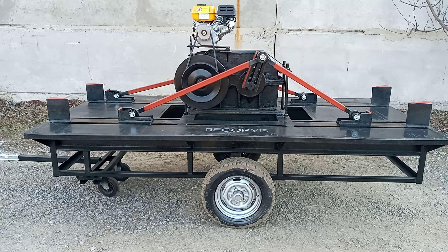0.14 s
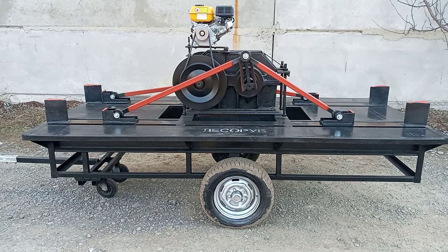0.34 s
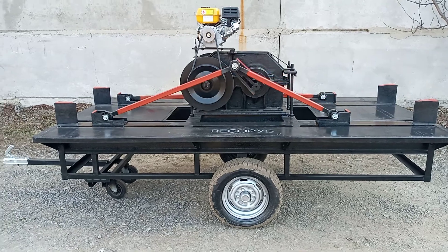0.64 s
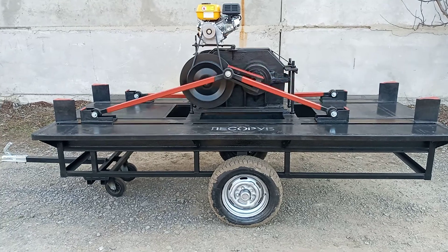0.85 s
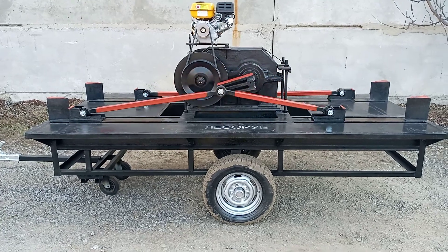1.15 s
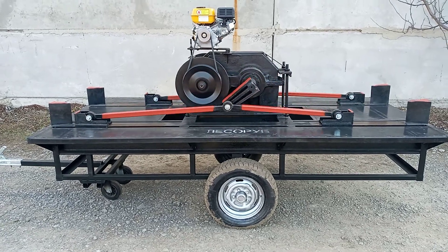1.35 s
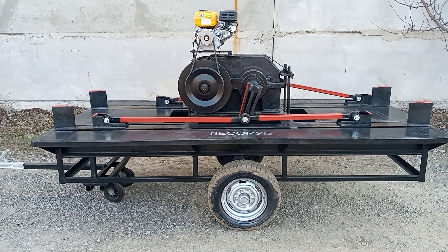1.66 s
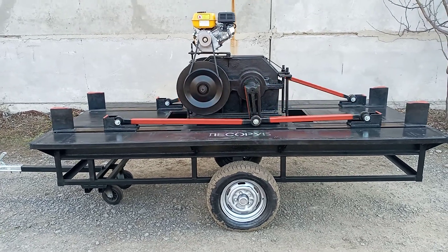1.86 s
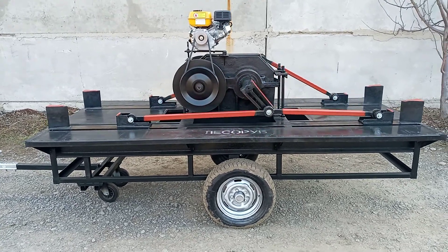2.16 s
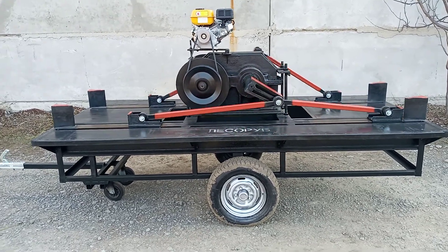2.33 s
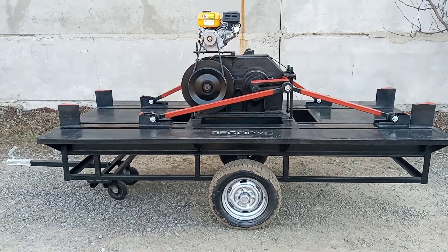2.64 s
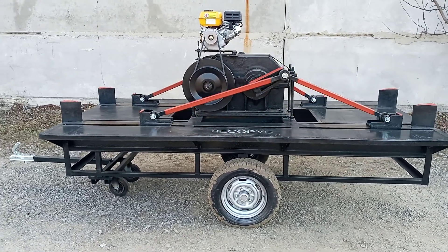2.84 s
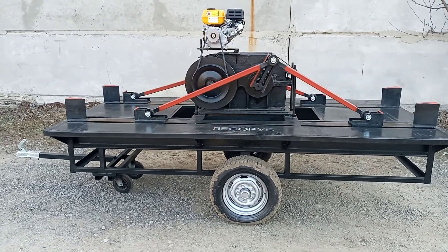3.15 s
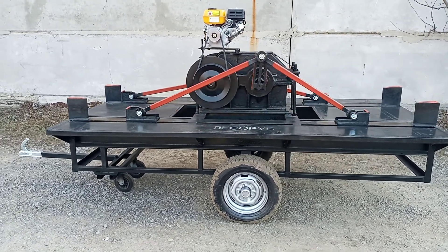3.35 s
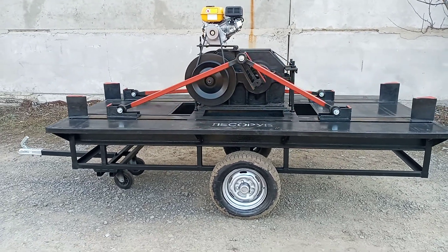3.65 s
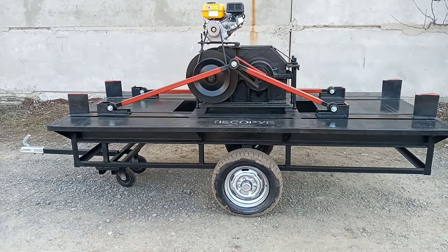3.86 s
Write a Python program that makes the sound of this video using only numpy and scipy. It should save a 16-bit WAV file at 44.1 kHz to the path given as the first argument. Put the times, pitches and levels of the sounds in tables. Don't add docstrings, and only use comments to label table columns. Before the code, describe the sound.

A small petrol engine chugs rapidly and steadily outdoors, with gear clatter and brief wind buffets

```python
import sys
import numpy as np
from scipy import signal
from scipy.fft import rfft, irfft
from scipy.io import wavfile
from scipy.ndimage import uniform_filter1d

SR = 44100
rng = np.random.default_rng(int(sys.argv[2]) if len(sys.argv) > 2 else 0)


def attenuation_scalar(level_db):
    decades = np.asarray(level_db, float) / 20
    return 10 ** decades


def bounce(signal):
    frames = np.transpose(np.atleast_2d(signal))
    limited = np.clip(frames, -1, 1)
    pcm = np.round(limited * 32767).astype(np.int16)
    wavfile.write(sys.argv[1], SR, pcm)


N = 176400

# t/s, engine cycles done
CRANK_MARKS = [
    (-.0586, -12),
    (.548, 0),
    (1.1547, 12),
    (1.7609, 24),
    (2.3691, 36),
    (2.9799, 48),
    (3.59, 60),
    (4.199, 72),
]


def level(x, db):
    return x * attenuation_scalar(db) / np.sqrt(np.mean(x ** 2))


def curve(table):
    hz, value = np.array(table, float).T
    bins_hz = np.fft.rfftfreq(N, 1 / SR)
    return np.interp(np.log(bins_hz + 1), np.log(hz), value)


def ring(x, hz, width_hz):
    return signal.lfilter(*signal.iirpeak(hz, hz / width_hz, fs=SR), x)


def body(x, modes):
    return sum(attenuation_scalar(db) * ring(x, hz, width_hz) for hz, width_hz, db in modes)


def walk(rate_hz):
    hold = int(SR / rate_hz)
    steps = np.repeat(rng.standard_normal(N // hold + 1), hold)
    return 0.79 * uniform_filter1d(uniform_filter1d(steps, hold), hold)[:N]


def grit(grain_db):
    # f/Hz, shared fraction (0-1)
    alike = [(500, 0.94), (2000, 0.8), (5000, 0.18), (9000, .5), (14000, 0)]
    common, separate = rfft(rng.standard_normal((2, N)))
    share = np.clip(curve(alike), 0, 1)
    other = share * common + np.sqrt(1 - share ** 2) * separate
    pair = np.array([irfft(common, N), irfft(other, N)])
    grains = uniform_filter1d(rng.exponential(size=N), size=3)
    return pair * attenuation_scalar(grain_db * grains)


def bursts(cycles, events, force_db=0):
    energy = 0
    for place, db, decay, scatter_db in events:
        since = cycles - place + 20
        phase = since % 1
        scatter = scatter_db * np.clip(rng.standard_normal(120), -1.6, 1.6)
        luck_db = (scatter + force_db)[since.astype(int)]
        onset = np.minimum(phase * 90, 1)
        energy = energy + attenuation_scalar(2 * (db + luck_db)) * np.exp(-2 * phase / decay) * onset
    return np.sqrt(energy)


def wind(t):
    # t/s, length/s, left level/dB, right level/dB
    gusts = [
        (1.363, 0.059, -32, -45),
        (1.606, 0.1, -21.5, -40),
        (1.736, .12, -32, -24),
        (1.999, 0.098, -15, -38),
        (2.304, 0.2, -27, -23),
        (2.967, 0.033, -36, -15),
        (3.202, 0.2, -30, -27.5),
    ]
    gain = attenuation_scalar(-42) * attenuation_scalar(2 * np.array([walk(6.2), walk(5.2)]))
    for at, length_s, *db in gusts:
        swell = np.exp(-((t - at) / length_s * 2) ** 2)
        gain = gain + attenuation_scalar(np.array(db))[:, None] * swell
    air = ring(rng.standard_normal((2, N)), 93, 144)
    air = ring(air, 93, 250)
    return gain * level(air, 0)


def whine(cycles):
    orders = [23, 45, 48, 52]
    orders_db = [-44.5, -44.5, -44.5, -43.5]
    tones = 0
    for order, db in zip(orders, orders_db):
        phase = 2 * np.pi * order * cycles + 0.63 * walk(7)
        tones = tones + attenuation_scalar(db + 2.6 * walk(9.1)) * np.sqrt(2) * np.sin(phase)
    return tones


def gear_clatter():
    return level(grit(0.5) * attenuation_scalar(1.56 * walk(24.95)), 0)


def gear_case(clatter, knock):
    # f/Hz, width/Hz, level/dB
    case = [(440, 23, -5), (590, 63, -9), (645, 82, 4), (1043, 150, -5), (1240, 110, -10), (1666, 54, -2.5),
            (1876, 14, -5), (1967, 23.5, 3.5), (2095, 22, -4.5), (3270, 210, -1), (6370, 160, 1.5)]
    ringing = body(clatter + attenuation_scalar(-6.5) * knock, case)
    direct = clatter - ring(clatter, 60, 400)
    return level(ringing, -32.5) + level(direct, -18.5)


def firing_force(cycles):
    # t/s, level/dB
    odd_firings = [(.91, 0), (1.163, 1.5), (1.214, 3), (1.366, 2), (1.412, -11.5), (1.517, 0), (1.566, 4),
                   (1.82, 3.5), (1.972, 3.5), (2.023, -2), (2.074, -1.5), (2.276, -1.5), (2.429, 1),
                   (2.479, 0), (2.682, 0), (2.734, -1.5), (2.887, 2.5), (3.09, 1.5), (3.14, 1.5),
                   (3.193, 1.5), (3.242, 3.5), (3.296, -1), (3.345, 1), (3.395, -2), (3.446, 2),
                   (3.952, -3.5)]
    force_db = np.zeros(120)
    for at, db in odd_firings:
        force_db[int(cycles[int(at * SR)] + 20.3)] = db
    return force_db


def valve_ticks(cycles, force_db):
    # share of cycle, level/dB, decay/cycles, scatter/dB
    valves = [
        (0.068, -3, .07, 2.5),
        (0.316, -3.5, .08, 4),
        (.49, -8.5, 0.25, 5.5),
        (.71, -22, 0.037, -11),
    ]
    ticks = bursts(cycles, valves, 0.16 * force_db) * grit(2.0)
    return level(ring(ticks, 12900, 7500), -20)


def combustion(cycles, force_db):
    # share of cycle, level/dB, decay/cycles, scatter/dB
    knocks = [
        (.17, 6, 0.13, 2),
        (.33, -5, 0.13, 5),
        (.52, -7.5, .1, 7),
    ]
    return level(bursts(cycles, knocks, force_db) * grit(0.62), 0)


def cylinder_head(knock):
    # f/Hz, width/Hz, level/dB
    head = [(2063, 130, -1), (2960, 230, -13), (3276, 160, -5), (4390, 89, 7), (5190, 300, 3.5),
            (6480, 320, -0.5)]
    return level(ring(knock, 4300, 6800), -25.5) + level(body(knock, head), -30)


def exhaust():
    # share of cycle, level/dB, scatter/dB
    puffs = [
        (0.029, -9.5, 1.5),
        (0.264, -9, -0.5),
        (0.374, 1.5, 1),
        (0.464, -5, 3.5),
        (0.591, -10, 5),
        (0.769, -5, 2),
        (0.914, -15, 2),
    ]
    # f/Hz, width/Hz, level/dB
    muffler = [(99.8, 5.9, -1), (145, 62, -4.5), (181.2, 45, 2), (246, 64, 2), (281, 29, -15.5)]
    times, count = np.array(CRANK_MARKS).T
    jitter_s = 0.0002
    pulses = np.zeros(N)
    for place, db, scatter_db in puffs:
        time_luck, level_luck = rng.standard_normal((78, 2)).T
        at_s = np.interp(np.arange(-10, 68) + place, count, times) + jitter_s * time_luck
        index = np.clip(at_s * SR, 0, N - 1).astype(int)
        pulses[index] += attenuation_scalar(db + scatter_db * level_luck)
    flow = rng.standard_normal(N) * attenuation_scalar(0.73 * walk(45))
    low = level(body(pulses, muffler), -23) + level(body(flow, muffler), -27)
    return signal.sosfilt(signal.butter(3, 335, fs=SR, output="sos"), low)


def machine(cycles):
    force_db = firing_force(cycles)
    knock = combustion(cycles, force_db)
    gears = gear_case(gear_clatter(), knock) + whine(cycles)
    return gears + valve_ticks(cycles, force_db) + cylinder_head(knock) + exhaust()


def wall_echo(near, t):
    delay_s, t60_s = 0.01188, 0.11
    tail = t[:8000]
    echo = rng.standard_normal((2, len(tail))) * (tail > delay_s) * attenuation_scalar(-60 * tail / t60_s)
    echo = echo * attenuation_scalar(-13) / np.sqrt(np.sum(echo ** 2, axis=1, keepdims=True))
    return signal.fftconvolve(near, echo, axes=1)[:, :N]


def scene():
    # f/Hz, level/dB
    left = [(400, 3), (2000, 2.5), (4000, -5.5), (5500, -8), (7000, -1), (8500, -15.5), (12500, -26.5),
            (14900, -10)]
    # f/Hz, level/dB
    right = [(400, 0), (2000, -2.5), (4000, -12), (6500, -13), (8000, -23.5), (10300, -14), (13800, -29),
             (14900, -22)]
    t = np.arange(N) / SR
    near = machine(np.interp(t, *np.array(CRANK_MARKS).T))
    heard = near + wall_echo(near, t)
    heard[1] = np.roll(heard[1], -42)
    ports = attenuation_scalar(np.array([curve(left), curve(right)]))
    return irfft(rfft(heard) * ports, N) + wind(t)


def roll_off(x):
    return signal.sosfilt(signal.butter(12, 15920, fs=SR, output="sos"), x)


def record(dry):
    x = signal.sosfilt(signal.butter(3, 62, "high", fs=SR, output="sos"), dry)
    x = signal.sosfilt(signal.ellip(10, .2, 70, 15750, fs=SR, output="sos"), x)
    bass = signal.sosfiltfilt(signal.butter(1, 450, fs=SR, output="sos"), x)
    start_s, fade_s = 0.41, 0.3
    fade = np.clip((np.arange(N) / SR - start_s) / fade_s, 0, 1)
    mix = bass * fade ** 0.75 + (x - bass) * fade ** 0.9
    return roll_off(mix)


dry = scene()
out = record(dry)
bounce(out)
```